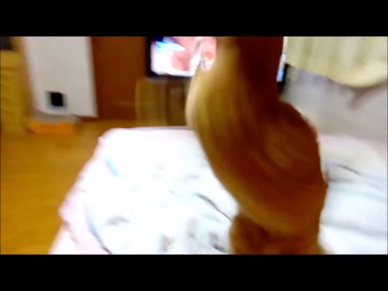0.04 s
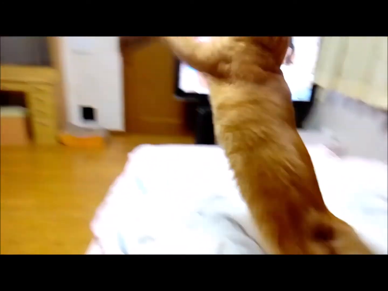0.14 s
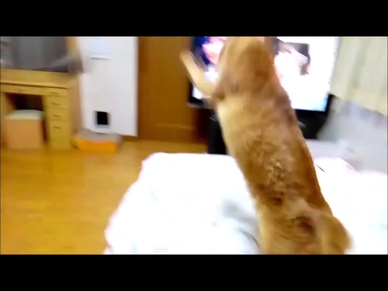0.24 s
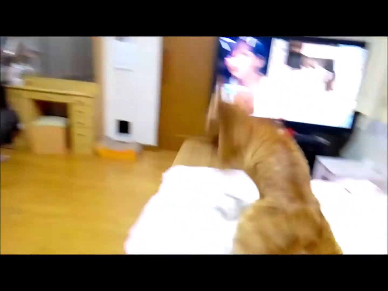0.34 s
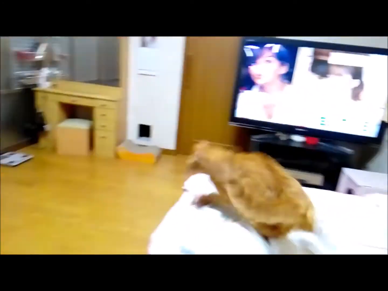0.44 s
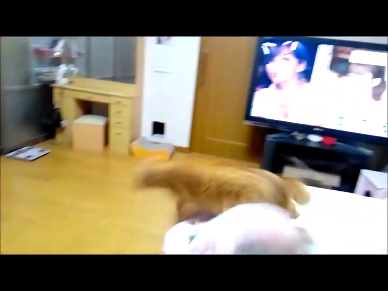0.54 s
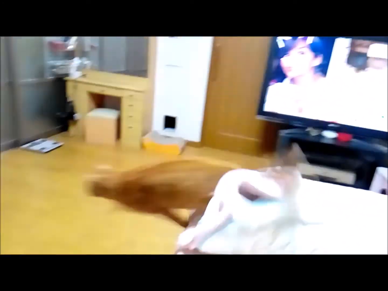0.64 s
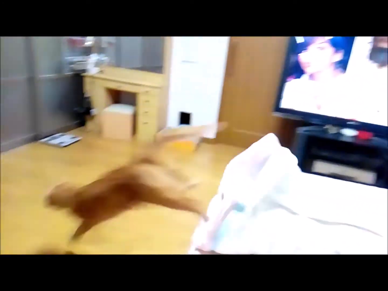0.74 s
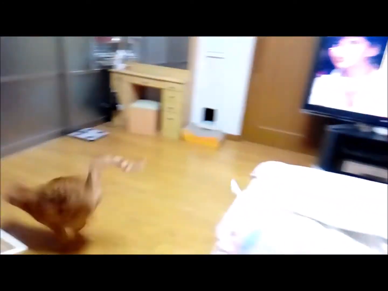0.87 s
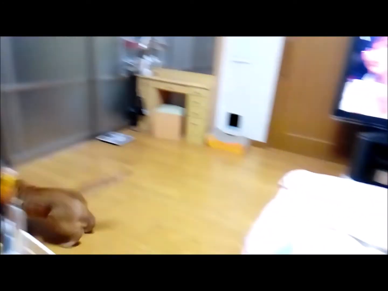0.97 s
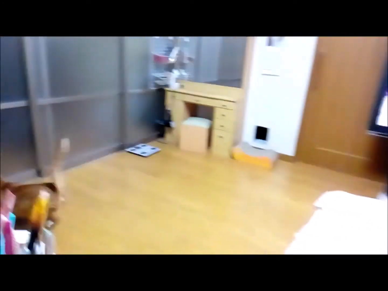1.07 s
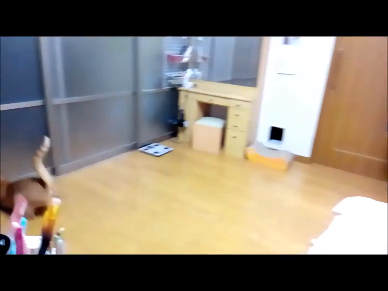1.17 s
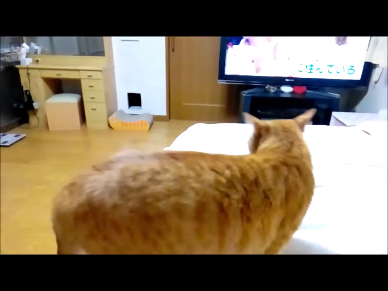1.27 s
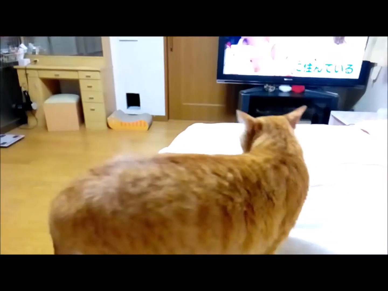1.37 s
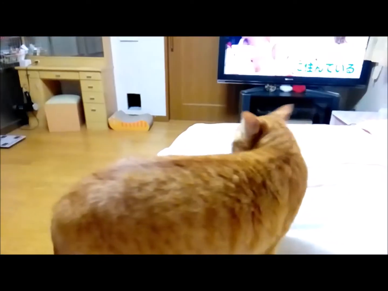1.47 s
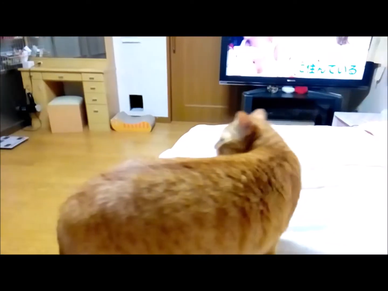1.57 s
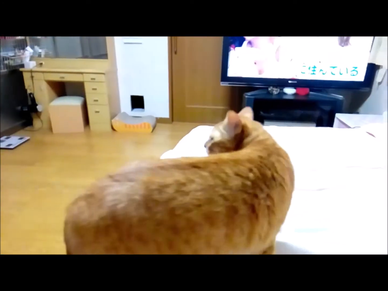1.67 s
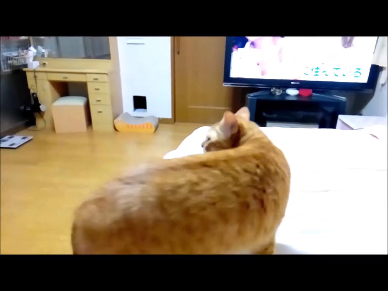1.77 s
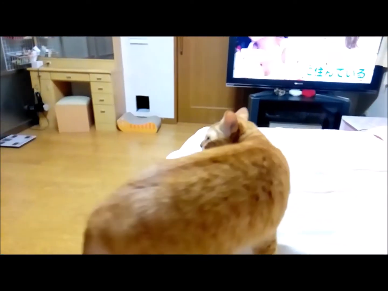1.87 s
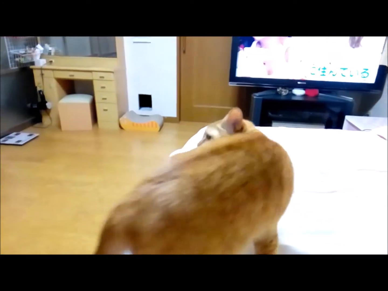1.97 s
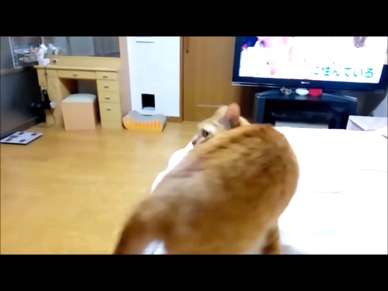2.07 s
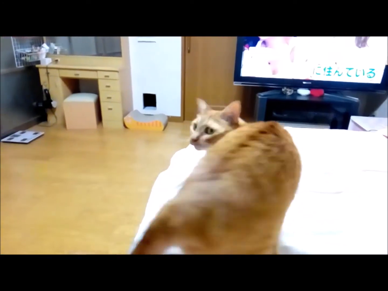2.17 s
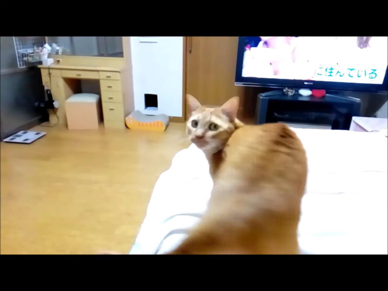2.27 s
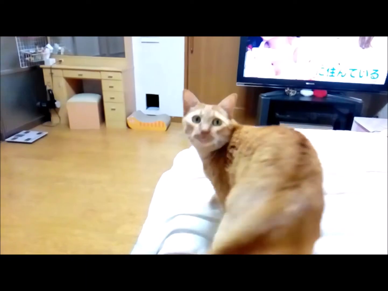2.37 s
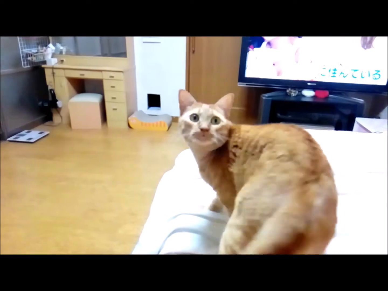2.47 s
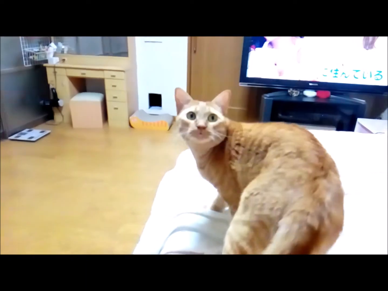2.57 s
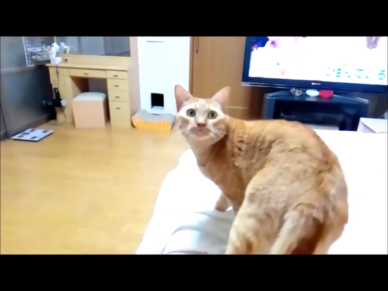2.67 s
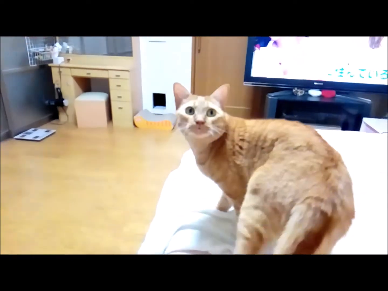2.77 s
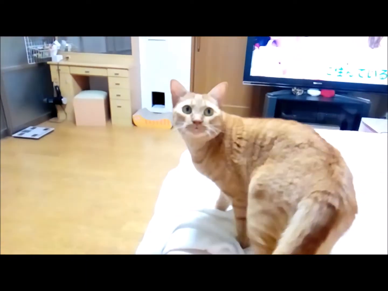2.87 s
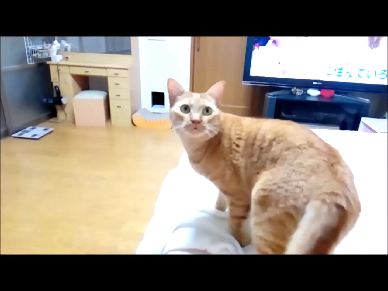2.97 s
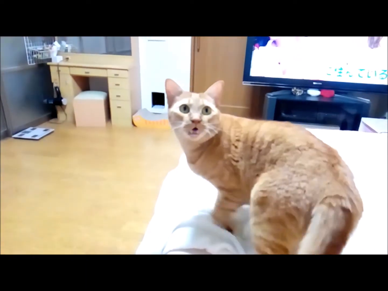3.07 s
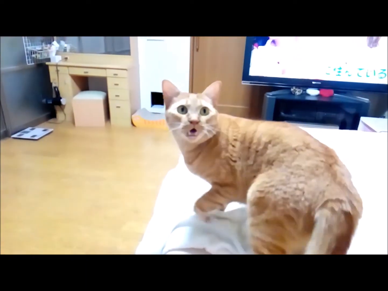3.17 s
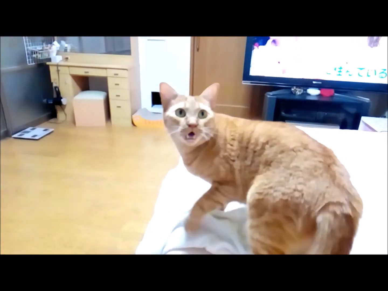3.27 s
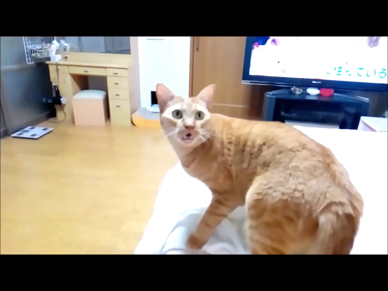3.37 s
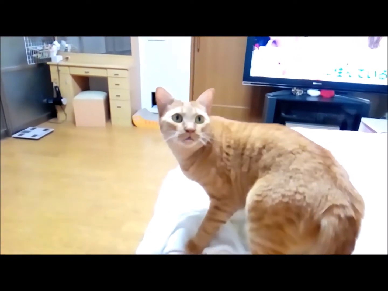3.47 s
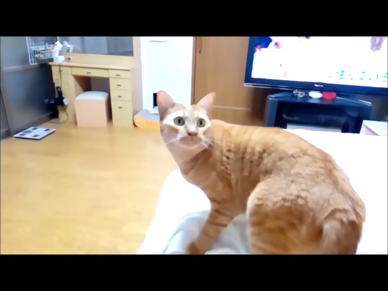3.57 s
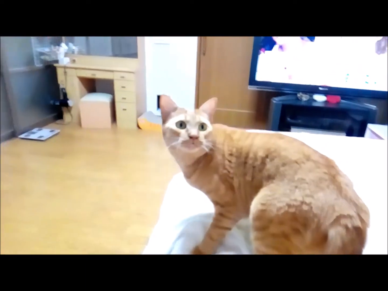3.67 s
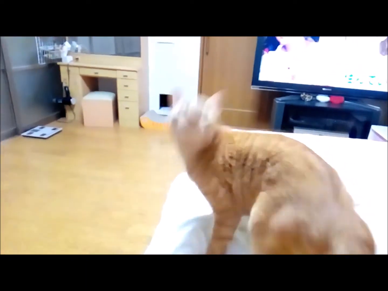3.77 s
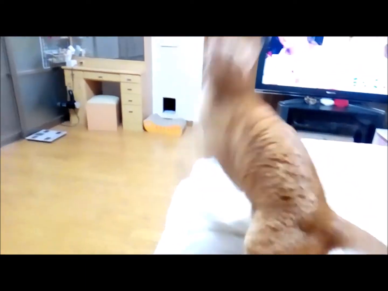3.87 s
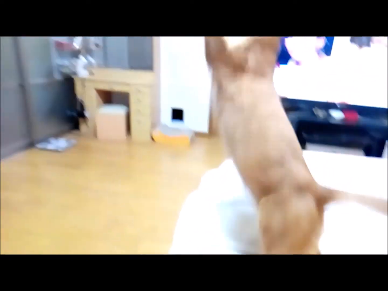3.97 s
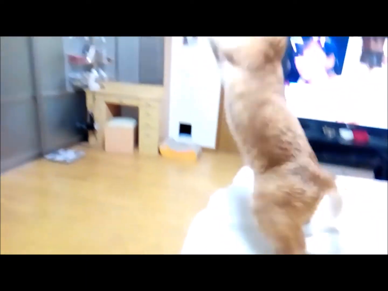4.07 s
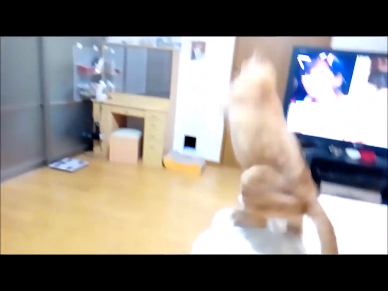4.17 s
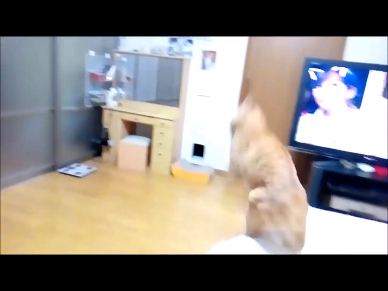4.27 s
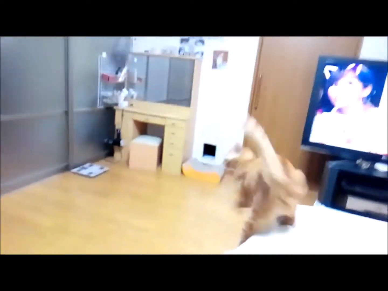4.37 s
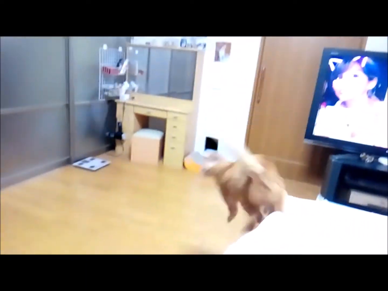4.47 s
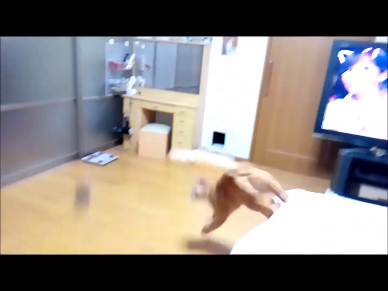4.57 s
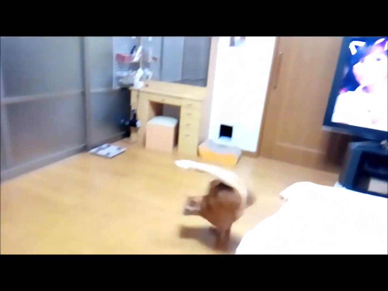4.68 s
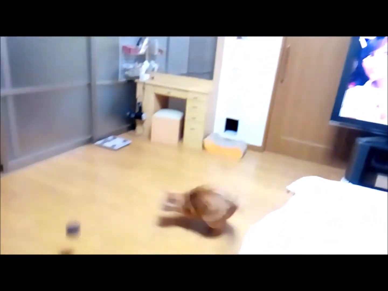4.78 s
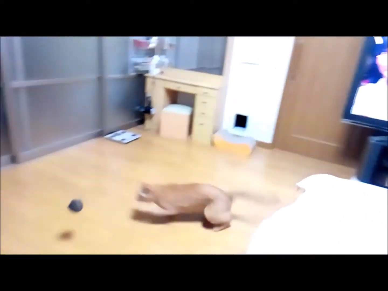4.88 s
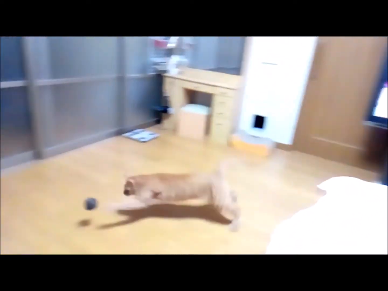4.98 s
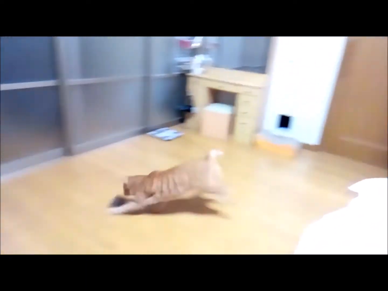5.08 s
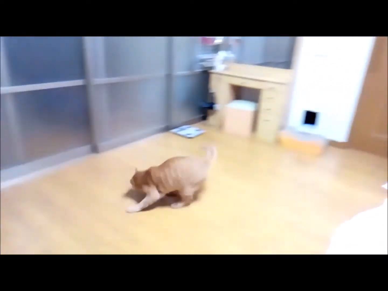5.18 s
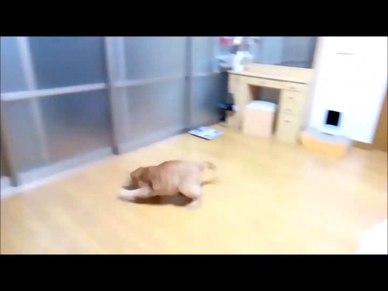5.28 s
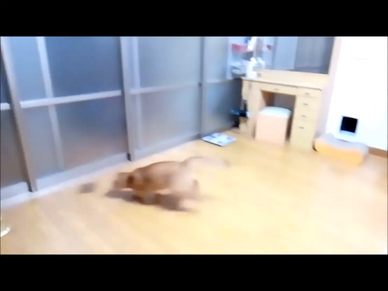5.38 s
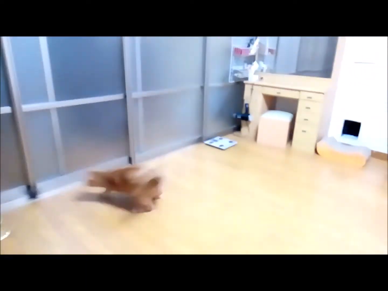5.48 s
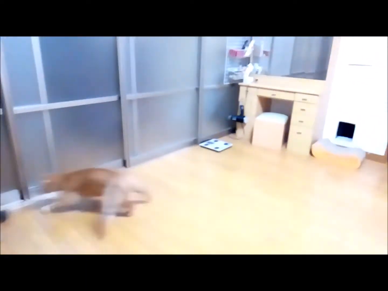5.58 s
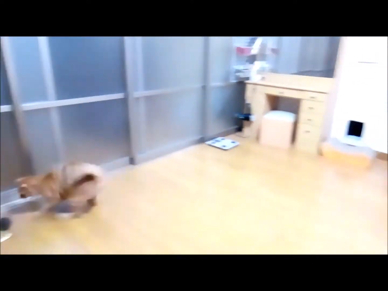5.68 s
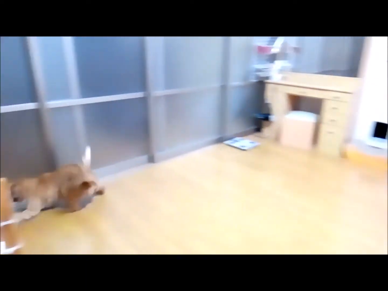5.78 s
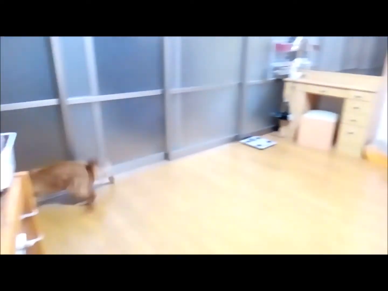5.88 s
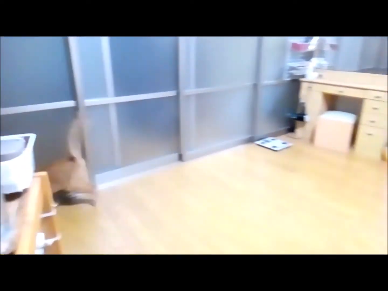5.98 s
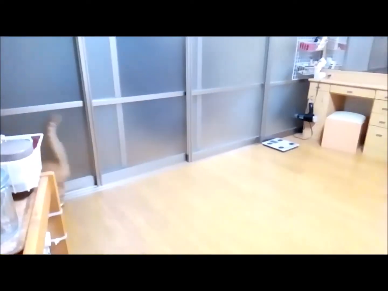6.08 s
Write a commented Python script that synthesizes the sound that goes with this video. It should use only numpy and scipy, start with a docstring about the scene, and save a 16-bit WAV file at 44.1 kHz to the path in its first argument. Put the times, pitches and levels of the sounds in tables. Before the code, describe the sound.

A faint fan hum and soft room hiss run underneath, picked up by a small microphone with a glassy ring near 5 kHz. From 0.15 to 1.2 s, cloth rustles and a cat leaps, with muffled low thuds, a light claw tick and faint scraping; at about 1.2 s a heavier thump, scratch and furniture knock. Sound drops out at 1.3 s and fades back quickly. From 1.35 to 1.95 s a high, nasal meow cracks upward early, flutters twice and sinks away. Quiet follows, with tiny movements. At 3.05-3.45 s a shorter, clearer meow rises and falls. Soft pushes begin near 3.85 s; at 4.4 s a sharp click and thump, then landings and a knock around 4.75 s. Very bright taps cluster at 4.97 and 5.1 s amid harsh, grainy claw skids. Galloping thuds and scrapes continue to a loud, rattling furniture bump at 5.9 s, trailing off scratchily past 6 s.

```python
"""Small room with a wooden floor: a cat leaps off a bed, skids after a toy and bumps the furniture.
Between two chases it meows twice. A fan hums faintly; the small microphone rings near 5 kHz.
After the first chase the sound drops out for a moment and fades back in.
Hum, cloth, paws, furniture and claws are shaped noise and struck resonances;
the meows are sums of partials with breath noise, and ten feedback delays make the room."""
import sys
import numpy as np
from scipy import signal
from scipy.fft import rfft, irfft, next_fast_len
from scipy.io import wavfile
from scipy.ndimage import uniform_filter1d

SR = 44100
rng = np.random.default_rng(int(sys.argv[2]) if len(sys.argv) > 2 else 0)


def inscribe(sig):
    """Save sig as 16-bit PCM at rate SR to the path in sys.argv[1].

    A 1-D sig is mono; a 2-D sig holds one channel per row.
    Samples are clipped to [-1, 1] before scaling.
    """
    pcm = np.round(np.clip(np.atleast_2d(sig).T, -1, 1) * 32767)
    wavfile.write(sys.argv[1], SR, pcm.astype(np.int16))


N = 270465


def amp(db):
    """Decibels to gain."""
    return 10 ** (np.asarray(db) / 20)


def rms_one(x):
    """Scale to unit rms."""
    return x / np.sqrt(np.mean(x ** 2) + 1e-20)


def at_hz(points, hz):
    """Read a spectrum on a log-frequency axis."""
    points_hz, points_db = np.transpose(points)
    return np.interp(np.log(hz), np.log(points_hz), points_db)


def drift(rate_hz, size=N):
    """Slow chance with spread 1: noise through a two-pole lowpass, after a second to settle."""
    r = np.exp(-2 * np.pi * rate_hz / SR)
    slow = signal.lfilter([1], [1, -2 * r, r * r], rng.standard_normal(size + SR))
    return rms_one(slow[SR:])


def coloured(spectrum):
    """Noise with the given spectrum, rms 1."""
    hz = np.maximum(np.fft.rfftfreq(N, 1 / SR), 1)
    inside = (hz > spectrum[0][0] / 2) & (hz < spectrum[-1][0] * 2)
    shape = amp(at_hz(spectrum, hz)) * inside
    return rms_one(irfft(rfft(rng.standard_normal(N)) * shape, N))


def resonance(x, hz, width_hz):
    """Two-pole peak with gain 1 on top."""
    r = np.exp(-np.pi * width_hz / SR)
    zeros = (1 - r * r) / 2 * np.array([1, 0, -1])
    poles = [1, -2 * r * np.cos(2 * np.pi * hz / SR), r * r]
    return signal.lfilter(zeros, poles, x)


def burst(start_s, t60_s, rise_s):
    """Samples and envelope of a swell that rises quickly and dies away."""
    start, t60_s = round(start_s * SR), np.clip(t60_s, .02, 2)
    t = np.arange(min(round(t60_s * SR), N - start)) / SR
    envelope = (1 - np.exp(-t / rise_s)) * amp(-60 * t / t60_s)
    return slice(start, start + len(t)), envelope


MIC_HZ, MIC_WIDTH_HZ = 5145, 454


def port(x, width_hz):
    """The air in the microphone port rings: two resonances in series, the second twice as wide."""
    return resonance(resonance(x, MIC_HZ, width_hz), MIC_HZ, 2 * width_hz)


# Colour of scratching through the microphone. Each row: frequency in Hz, relative density in dB per Hz.
BRIGHT_COLOUR = [(2500, -9), (3500, -2), (4400, -0.5), (5900, 5.5), (7000, -6), (9000, -9.5), (12000, -56)]
BROAD_DB = -6   # re the ringing


def scratchy(grain_db):
    """Bright noise that rings in the microphone port, its level broken into grains."""
    grains = amp(grain_db * np.clip(drift(235), -2, 2))
    ringing = rms_one(port(grains * rng.standard_normal(N), MIC_WIDTH_HZ))
    broad = rms_one(grains * coloured(BRIGHT_COLOUR))
    return rms_one(ringing + amp(BROAD_DB) * broad)


# Room noise colour. Each row: frequency in Hz, relative density in dB per Hz.
AIR_COLOUR = [(18, -71), (30, -34), (130, -7.5), (173, -9.5), (317, -8), (423, -100), (482, -5.5),
              (564, -8), (695, -14), (952, -11.5), (1060, -19.5), (1790, -14), (2440, -32), (10600, -14.5),
              (15700, -27)]
AIR_DB = -64.5
# Fan hum bands. Each row: centre in Hz, width of each of two filters in Hz, level in dB.
FAN_BANDS = [(234.4, 29, -68), (339, 32, -80), (486, 34, -71.5), (714, 69, -73)]


def air():
    """Steady room noise with the narrow hum bands of a fan, each drifting in level."""
    white = rng.standard_normal(N)
    out = amp(AIR_DB) * coloured(AIR_COLOUR)
    for hz, width_hz, db in FAN_BANDS:
        band = rms_one(resonance(resonance(white, hz, width_hz), hz, width_hz))
        out += amp(db + 2.1 * drift(4.1)) * band
    return out


# Bedding and movement under the chase. Each row: time in seconds, low rustle in dB, bright rustle in dB.
RUSTLE_LEVELS = [(0, -62.5, -67), (.22, -64, -63.5), (.34, -53, -63), (1.13, -55, -57.5),
                 (1.279, -47.5, -36.5), (1.36, -58.5, -72), (2.0, -60.5, -79), (3.111, -70.5, -73.5),
                 (3.7, -67.5, -74.5), (3.82, -64, -65.5), (4.05, -65, -64), (4.55, -60.5, -76.5),
                 (4.71, -70.5, -47.5), (5.25, -54, -46.5), (5.5, -56.5, -51), (5.75, -52.5, -44),
                 (6.13, -53, -47)]
# Low rustle colour. Each row: frequency in Hz, relative density in dB per Hz.
LOW_RUSTLE_COLOUR = [(24, -53), (40, -7.5), (336, -3.5), (536, -11.5), (901, -16.5), (1090, -22),
                     (1390, -39), (2500, -30.5), (3250, -28), (5500, -120)]


def rustle():
    """Cloth and footing noise that swells with the chase."""
    s, low_db, bright_db = np.transpose(RUSTLE_LEVELS)
    t = np.arange(N) / SR
    low = amp(np.interp(t, s, low_db) + 3.5 * drift(5.7)) * coloured(LOW_RUSTLE_COLOUR)
    bright = amp(np.interp(t, s, bright_db)) * scratchy(grain_db=2.0)
    return low + bright


# Paws and body landing. Each row: start in seconds, level in dB, centre in Hz, t60 in seconds.
LANDINGS = [(0.155, -47.5, 228, 0.35), (0.279, -37, 148, 0.15), (0.329, -42.5, 60, 0.54),
            (0.601, -28, 243, 0.16), (0.636, -40.5, 314, 0.57), (0.812, -34.5, 339, 0.24),
            (0.846, -41, 368, 0.57), (0.934, -43, 385, 0.27), (1.016, -37.5, 415, 0.3),
            (1.047, -34.5, 106, 0.2), (1.189, -23.5, 122, 0.22), (1.211, -25.5, 91, 0.2),
            (1.263, -37, 139, 0.15), (2.062, -49.5, 243, 0.33), (2.801, -49.5, 327, 0.11),
            (3.839, -45, 178, 0.11), (3.865, -47.5, 104, 0.44), (3.9, -48.5, 65, 0.47),
            (3.94, -49, 50, .35), (4.015, -40, 295, 0.33), (4.02, -45, 740, 0.34), (4.187, -44, 286, 0.15),
            (4.236, -46, 218, 0.31), (4.33, -44, 150, 0.22), (4.38, -27, 598, 0.19),
            (4.387, -33.5, 169, 0.13), (4.452, -41.5, 490, 0.18), (4.664, -30, 610, 0.24),
            (4.668, -36, 144, 0.47), (4.723, -25, 187, 0.35), (4.72, -33, 433, 0.22),
            (4.763, -31, 148, 0.16), (4.81, -30.5, 480, 0.28), (4.968, -40.5, 700, 0.14),
            (5.03, -42, 420, .2), (5.075, -33.5, 470, 0.23), (5.091, -40.5, 180, 0.39),
            (5.317, -40, 575, 1), (5.364, -32, 460, 0.21), (5.555, -33, 610, 0.16), (5.535, -34, 127, 0.11),
            (5.591, -38.5, 91.5, 0.12), (5.622, -28, 542, 0.23), (5.78, -27.5, 843, 0.32),
            (5.919, -25, 101, 0.51), (6.091, -51, 89.5, 0.12)]


def thuds():
    """A soft push and the shaking after it move the boards or the mattress around one low pitch."""
    out, white = np.zeros(N), rng.standard_normal(N)
    for s, db, hz, t60_s in LANDINGS:
        span, shape = burst(s, t60_s, rise_s=0.0015)
        shaking = rms_one(resonance(resonance(white[span], hz, 0.14 * hz), hz, 5.84 * hz))
        t = np.arange(len(shape)) / SR
        push = np.sin(2 * np.pi * hz * t) * np.exp(-.7 * hz * t)
        out[span] += amp(db) * shape * (amp(-6.5) * shaking + 1.34 * push)
    return out


# Blows on the furniture. Each row: start in seconds, drive level in dB, rattle t60 in seconds.
BLOWS = [(1.238, -21.5, 0.21), (4.766, -22, 0.32), (4.788, -40, 0.18), (5.888, -17.5, 0.23),
         (5.914, -22.5, 0.075), (5.948, -26.5, 0.57), (6.046, -32, 0.28)]
# Modes of the furniture. Each row: frequency in Hz, gain in dB, t60 in seconds.
PANEL_MODES = [(274, 3.5, 0.061), (400, 7.5, 0.07), (510, 11.5, 0.06), (601, 13, 0.12), (660, 13.5, 0.026),
               (840, 11.5, 0.068), (1044, 5.5, 0.063), (1246, 4, 0.065), (1505, 1.5, 0.043),
               (1920, -1, 0.12)]


def bumps():
    """A blow and the rattle after it strike the modes of the furniture."""
    shake, out = np.zeros(N), np.zeros(N)
    for s, db, t60_s in BLOWS:
        span, shape = burst(s, t60_s, rise_s=0.00062)
        shake[span] += amp(db) * shape
    for hz, db, t60_s in PANEL_MODES:
        knocks = shake * rng.standard_normal(N) * amp(3.6 * drift(100))
        width_hz = np.log(1000) / (np.pi * t60_s)
        out += amp(db) * resonance(knocks + 1e-18, hz, width_hz)
    return out


# Claws and toy tapping the boards.
# Each row: start in seconds, ping peak in dB, dull part in dB re ping, top part in dB re ping.
TAP_HITS = [(0.1991, -25, -2, -30), (3.0577, -44, -14, -20), (4.3848, -27, -6, -20), (4.4213, -4, -14, -4),
            (4.77, -9, -17, -16), (4.7838, -9, -17, -12), (4.9617, -26, -17, -20), (4.9658, -1.5, -16, -12),
            (4.976, -11, -21, -14), (4.9792, -6, -22, -16), (4.9846, -11, -18, -16), (5.0956, -7, -10, -14),
            (5.1003, -17, -19, -16), (5.1207, -7, -20, -10), (5.538, -15, -18, -18), (5.785, -24, -10, -18)]


def taps():
    """Each tap is one click: it rings the microphone port and has a duller and a brighter part."""
    click = np.eye(1, SR // 50)[0]
    ping = port(click, 1180)
    knock = resonance(resonance(click, 4400, 1600), 1670, 2300)
    tick = resonance(resonance(click, 6700, 1300), 7600, 5400)
    ping, knock, tick = [part / np.abs(part).max() for part in (ping, knock, tick)]
    out = np.zeros(N)
    for s, db, dull_db, top_db in TAP_HITS:
        at = round(s * SR)
        out[at:at + len(click)] += amp(db) * (ping + amp(dull_db) * knock + amp(top_db) * tick)
    return out


# Dull scraping colour. Each row: frequency in Hz, relative density in dB per Hz.
DULL_COLOUR = [(200, -61), (400, 0.5), (800, -12), (1500, -1.5), (3000, -5.5), (4500, -16.5), (7000, -31)]


def dull_scraping(patchy_db):
    """Dull scraping: each stretch of pitch comes and goes by itself, at random."""
    noise, out = coloured(DULL_COLOUR), np.zeros(N)
    for k, hz in enumerate(np.geomspace(350, 4500, 12)):
        patches = amp(patchy_db * np.clip(drift(23), -2, 2))
        out += (-1) ** k * patches * resonance(noise, hz, 0.22 * hz)
    return rms_one(out)


# Claws and fur dragging.
# Each row: start in seconds, bright part in dB, dull part in dB re bright, top part in dB re bright.
DRAGS = [(0.198, -48, 0.5, -29), (.603, -51, 0, -25), (0.741, -59.5, 6, -6), (0.804, -45.5, -1, -13),
         (.844, -53, -15, -12), (0.939, -45, -8, -7), (1.16, -47, -23, -2), (1.198, -41, 2, -3),
         (1.228, -28.5, -8.5, -1.5), (1.246, -32, -6, -19), (1.265, -40, 3, -28), (2.33, -60, -9, -15),
         (4.017, -57, -5, -3), (4.363, -49, -1, -1.5), (4.382, -41, -4, -22), (4.656, -46, 8.5, -22),
         (4.765, -28.5, -25, -17), (4.798, -23, -8.5, -9), (4.97, -18.5, -40, -5.5),
         (5.02, -21.5, -22.5, -12), (5.094, -25, -7.5, -14), (5.124, -28, -22, -6),
         (5.289, -24.5, -12, -13), (5.352, -41.5, -3, -22), (5.397, -33, -11, -15),
         (5.536, -26.5, -11.5, -32), (5.565, -31, -16, -13), (5.782, -32.5, -6.5, -9.5),
         (5.85, -32.5, -16, -4), (5.901, -31, -29, -18), (5.999, -41, 0, -4)]
# A light drag rings on up to about 0.4 s; the hardest all last 0.27 s.
# Each row: bright level in dB, t60 in seconds.
DRAG_LENGTH = [(-66, 0.42), (-7, 0.21), (-28.5, 0.27)]
# Topmost scratching colour. Each row: frequency in Hz, relative density in dB per Hz.
TOP_COLOUR = [(5000, -65), (6500, 9), (8000, 3), (10800, 0), (12000, -22), (15500, -16)]


def skids():
    """Grainy scratching in swells whose powers add; the topmost treble dies sooner."""
    bright, dull, top = np.zeros((3, N))   # powers
    for s, db, dull_db, top_db in DRAGS:
        t60_s = np.interp(db, *np.transpose(DRAG_LENGTH))
        span, shape = burst(s, t60_s, rise_s=0.0039)
        bright[span] += (amp(db) * shape) ** 2
        dull[span] += (amp(db + dull_db) * shape) ** 2
        top[span] += (amp(db + top_db) * shape ** 1.17) ** 2
    grains = rms_one(amp(3.1 * np.clip(drift(93), -2, 2)))
    scratch = rms_one(amp(1.84 * drift(23)) * scratchy(grain_db=0.7))
    scrape = np.sqrt(dull) * dull_scraping(patchy_db=2.5) + np.sqrt(top) * coloured(TOP_COLOUR)
    return np.sqrt(bright) * scratch + grains * scrape


# Throat flutter. Each row: first throb in seconds, last throb in seconds, throbs per second, depth 0-1.
THROAT_TRILLS = [(1.567, 1.603, 54, .85), (1.812, 1.856, 46, .75), (3.378, 3.42, 60, .3)]


def flutter(t):
    """Level of the voice while the throat flutters; each trill swells in and out over half a throb."""
    gain = np.ones(len(t))
    for first_s, last_s, rate_hz, depth in THROAT_TRILLS:
        to_edge_s = np.minimum(t - first_s, last_s - t)
        inside = np.clip(1 + 2 * rate_hz * to_edge_s, 0, 1) ** .5
        gain *= 1 + depth * inside * np.cos(2 * np.pi * rate_hz * (t - first_s))
    return gain


# Two calls. Each row: time in seconds, pitch in Hz, level in dB, mouth opening 0-1,
# fundamental in dB re level, treble in dB re level.
CALLS = [
    [(1.34, 732, -37.5, 0.13, -12, -23), (1.39, 761.6, -34.5, 0.62, -9.5, -8),
     (1.425, 770, -28.5, 0.8, -29, -22), (1.465, 773, -36.5, 0.52, -24, -22),
     (1.525, 751, -30.5, 0.6, -16, -27), (1.55, 758.4, -40, 0.5, -13, -22),
     (1.567, 745, -29.5, 0.9, -23, -22), (1.59, 740, -30, 0.59, -19, -16),
     (1.63, 727, -29.5, 0.93, -11, -19), (1.7, 742.4, -34, 0.58, -5, -18.5),
     (1.76, 734, -30.5, 0.73, -8.5, -22), (1.8, 731, -37, 0.47, -8, -14), (1.845, 703.6, -33, .9, -10, -29),
     (1.89, 699, -42, 0.82, -0.5, -16), (1.92, 678, -46.5, 0.9, -10, -25), (1.96, 656, -50.5, 0.9, -3, -37)],
    [(3.03, 594, -66, 0, 13, -12), (3.055, 639, -55.5, 0.5, 2, -23), (3.11, 701.3, -39.5, 0.38, 0, -16.5),
     (3.145, 717, -39, 0.74, -3.5, -21), (3.185, 705, -34.5, 0.8, -7.5, -13),
     (3.23, 699.8, -30, 0.98, -4.5, -17.5), (3.295, 721.4, -31.5, 0.98, -12, -17.5),
     (3.38, 688.6, -38, 0.74, 0.5, -8), (3.415, 639, -44.5, 0.36, -0.5, -11),
     (3.435, 623, -53, 0.2, -3, -12), (3.47, 600, -76, .3, 0, -20)],
]
# The voice cracks upward for a moment. Each row: same columns.
VOICE_CRACK = [(1.44, 759, -53, .2, -9, -37), (1.462, 832, -34, 0.7, -6.5, -25),
               (1.51, 787, -59, 0.22, -12, -40)]
# Colour of the partials from the 4th up, head turned away, then facing.
# Each row: frequency in Hz, gain in dB.
UPPER_COLOUR = [
    [(2900, -12), (3300, -16), (3700, -15), (3850, -27), (4400, -27), (4800, -12), (5150, 0), (5400, -8),
     (5800, -26), (6600, -21), (7400, -34), (9000, -50)],
    [(2800, -20), (3300, -40), (3600, -40), (4250, -21), (4900, -1), (5300, 0), (5750, 3), (6050, -12),
     (6400, -19), (7200, -38), (9000, -50)],
]
# Sigh level in dB, one for each call.
SIGH_LEVELS_DB = [-64, -57]
MOUTH_SHUT_HZ, MOUTH_OPEN_HZ, MOUTH_HALF_WIDTH_HZ = 1340, 2290, 388
WOBBLE_SHARE, SHIMMER_DB, RASP_SHARE = .0025, 1.2, .07   # of pitch, of each partial, of fast level
BREATH_DB, SIGH_EARLY_S, SIGH_S = -14, .04, .035   # breath re treble; sigh centre before call end, width


def partial_levels(hz, opening, first_db, treble_db, upper):
    """Partials 1-11 in dB: the mouth's resonance, rising as it opens, shapes the 2nd and 3rd."""
    mouth_hz = MOUTH_SHUT_HZ + (MOUTH_OPEN_HZ - MOUTH_SHUT_HZ) * opening
    levels = [first_db]
    for k in (2, 3):
        off_peak = (k * hz - mouth_hz) / MOUTH_HALF_WIDTH_HZ
        levels.append(-20 * np.log10(1 + off_peak ** 2))
    return levels + [treble_db + at_hz(upper, k * hz) for k in range(4, 12)]


def meows():
    """Clean partials on a slightly wobbling pitch, shaped by the mouth; breath hisses around them."""
    out, hiss = np.zeros(N), rms_one(port(scratchy(grain_db=2.5), 600))
    for rows, upper in zip(CALLS + [VOICE_CRACK], UPPER_COLOUR + UPPER_COLOUR[:1]):
        s, *columns = np.transpose(rows)
        span = np.arange(round(s[0] * SR), round(s[-1] * SR))
        t, size = span / SR, len(span)
        hz, db, opening, first_db, treble_db = [np.interp(t, s, c) for c in columns]
        hz = uniform_filter1d(hz, size=SR // 40, mode="nearest")   # the throat glides, it does not jerk
        phase = 2 * np.pi * np.cumsum(hz * (1 + WOBBLE_SHARE * drift(72, size))) / SR
        tone = np.zeros(size)
        for k, part_db in enumerate(partial_levels(hz, opening, first_db, treble_db, upper), 1):
            level = np.sqrt(2) * amp(db + part_db + SHIMMER_DB * drift(31, size))
            tone += level * np.sin(k * phase + k * k)
        tone *= 1 + RASP_SHARE * drift(236, size)   # uneven cycles put a haze between the partials
        breath = amp(db + treble_db + BREATH_DB) * hiss[span]
        out[span] += (tone + breath) * flutter(t) * signal.windows.tukey(size, .04)
    t = np.arange(N) / SR
    for rows, sigh_db in zip(CALLS, SIGH_LEVELS_DB):
        centre_s = rows[-1][0] - SIGH_EARLY_S
        out += hiss * amp(sigh_db) * np.exp(-((t - centre_s) / SIGH_S) ** 2)
    return out


ROOM_T60_S, WALL_CUT_HZ = 0.22, 21000


def room(x):
    """Ten feedback delays, duller on every round, summed on a frequency grid."""
    size = next_fast_len(N + SR)
    turn = -2j * np.pi * np.fft.rfftfreq(size)
    wall = np.abs(1 / (1 - turn * SR / (2 * np.pi * WALL_CUT_HZ)))
    response = 0
    for k, lag_s in enumerate(rng.uniform(0.0098, .035, 10)):
        loop = amp(-60 * lag_s / ROOM_T60_S) * wall * np.exp(turn * lag_s * SR)
        response = response + (-1) ** k * loop / (1 - loop)
    return irfft(rfft(x, size) * response, size)[:N]


def scene():
    """Calls and hits sound in the room, over the skids, the rustle and the air."""
    background = air() + rustle()
    hits = thuds() + bumps() + taps()
    drags, voice = skids(), meows()
    wet = room(amp(-14.5) * voice + amp(-41.0) * hits)
    return (background + hits + drags + voice + wet)[None]


DROP_S, BACK_S, FADE_S = 1.293, 1.338, .2   # FADE_S: time constant
LOW_CUT_HZ, CUTOFF_HZ = 63, 16000


def record(dry):
    """A short drop-out with a fade-in; the deepest bass is removed and the top is cut."""
    t = np.arange(N) / SR
    closing = np.clip((DROP_S - t) / 0.00063, .003, 1)
    fade_in = 1 - np.exp(-np.maximum(t - BACK_S, 0) / FADE_S)
    gain = np.where(t < BACK_S, closing, fade_in)
    thin = signal.sosfilt(signal.butter(2, LOW_CUT_HZ, "high", fs=SR, output="sos"), dry)
    return signal.sosfilt(signal.cheby2(16, 60, CUTOFF_HZ, fs=SR, output="sos"), thin * gain)


dry = scene()
out = record(dry)
inscribe(out)
```